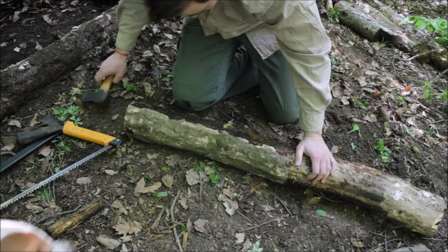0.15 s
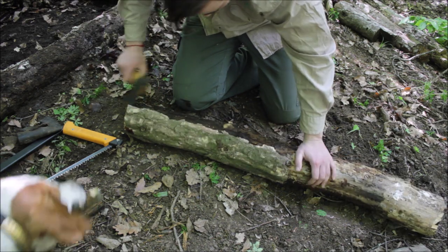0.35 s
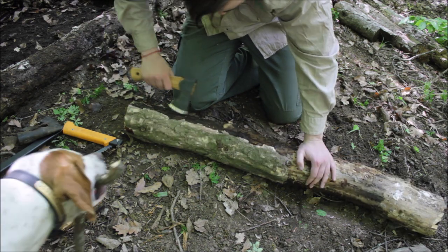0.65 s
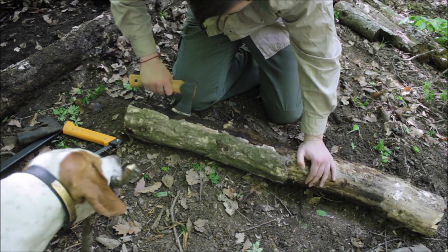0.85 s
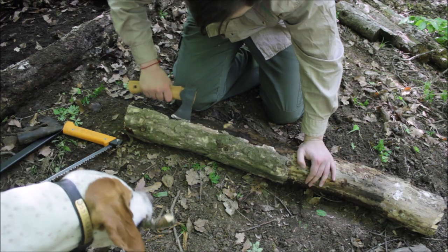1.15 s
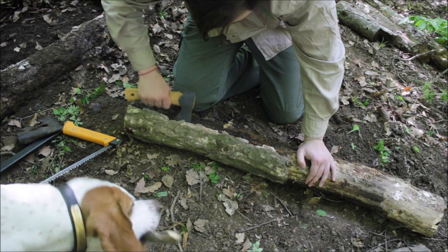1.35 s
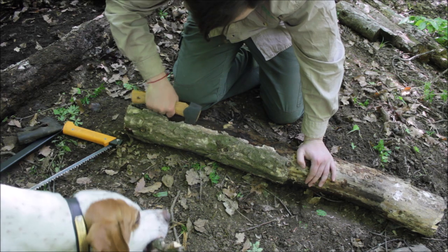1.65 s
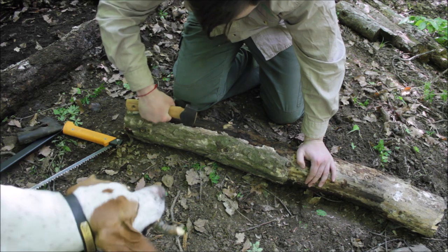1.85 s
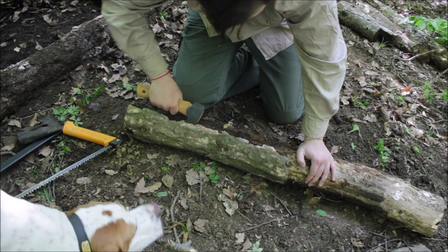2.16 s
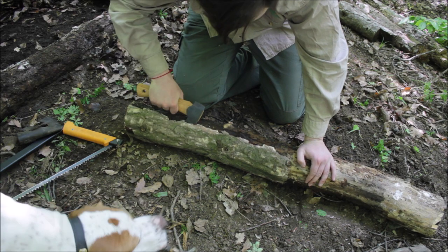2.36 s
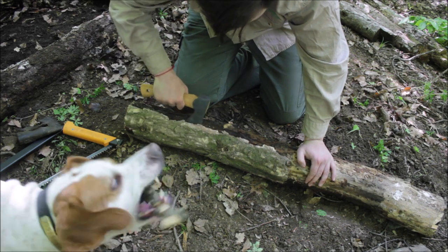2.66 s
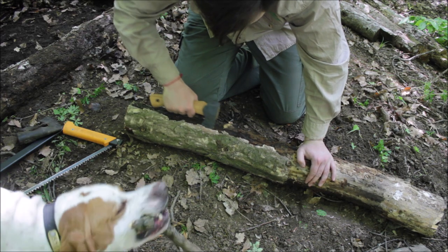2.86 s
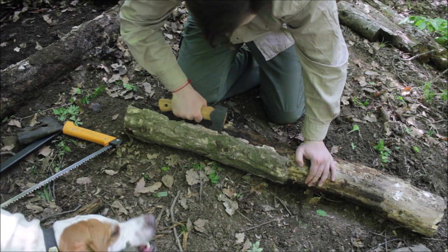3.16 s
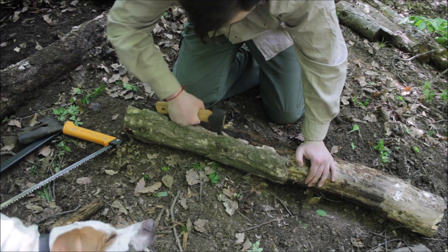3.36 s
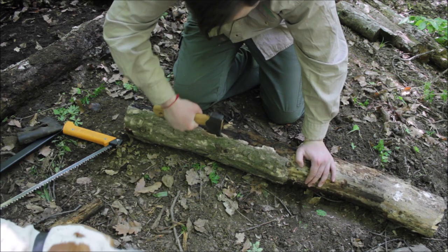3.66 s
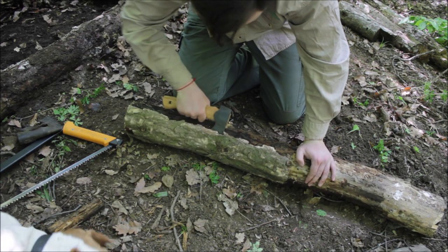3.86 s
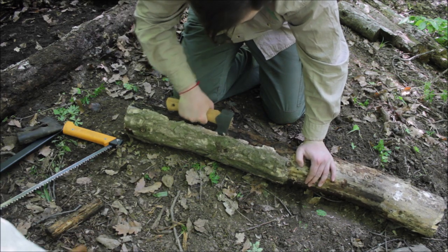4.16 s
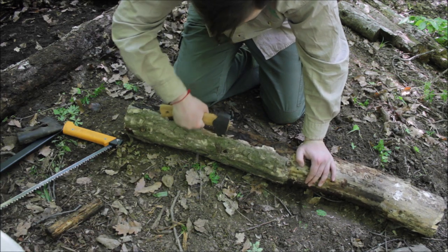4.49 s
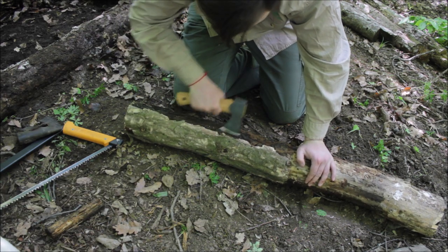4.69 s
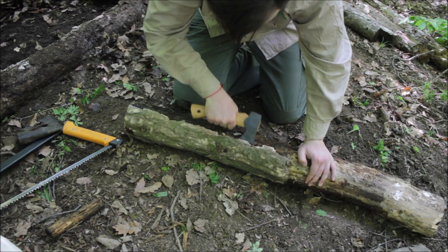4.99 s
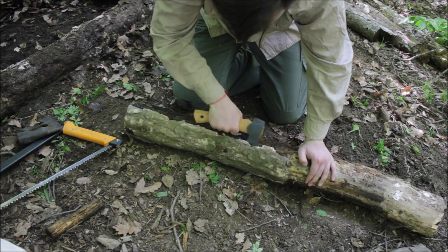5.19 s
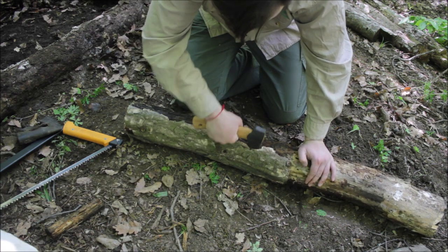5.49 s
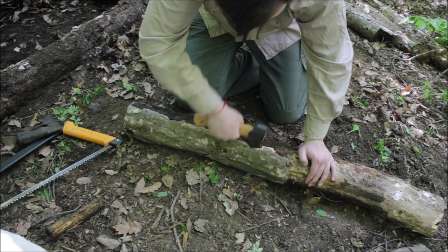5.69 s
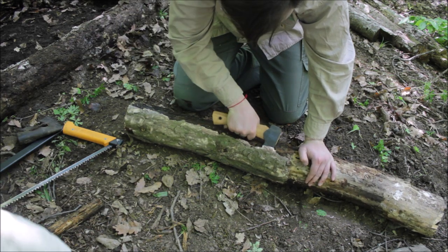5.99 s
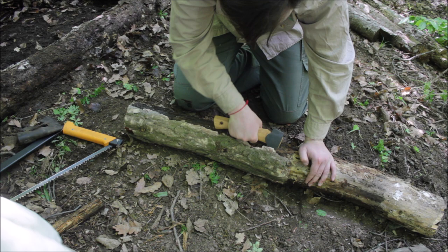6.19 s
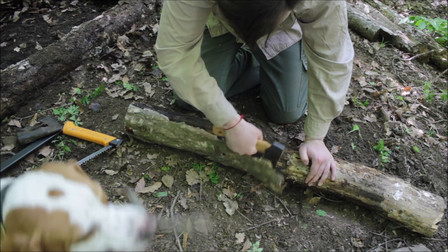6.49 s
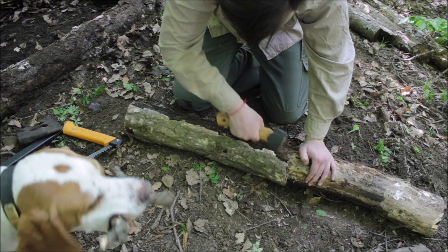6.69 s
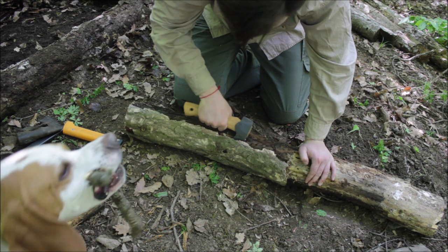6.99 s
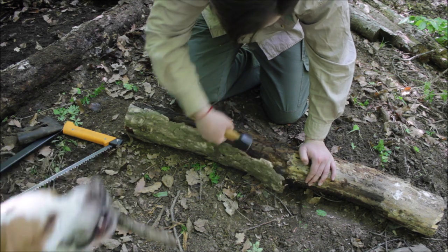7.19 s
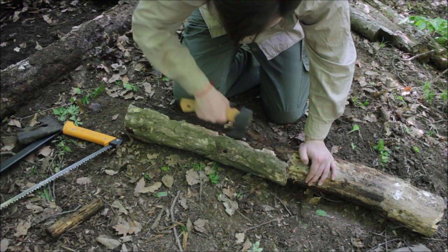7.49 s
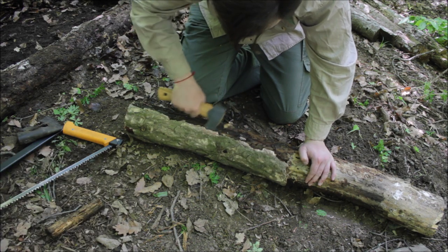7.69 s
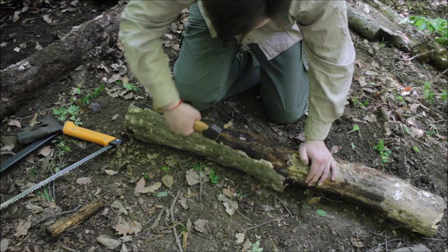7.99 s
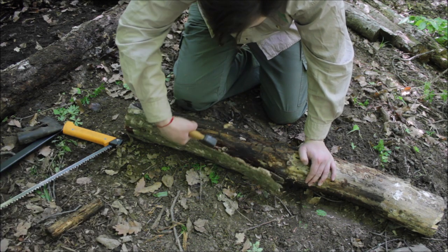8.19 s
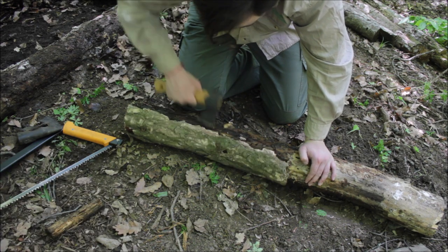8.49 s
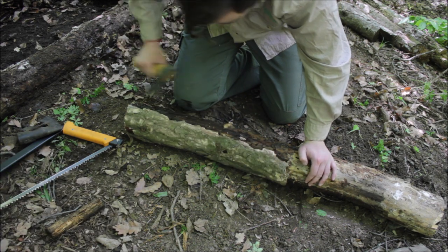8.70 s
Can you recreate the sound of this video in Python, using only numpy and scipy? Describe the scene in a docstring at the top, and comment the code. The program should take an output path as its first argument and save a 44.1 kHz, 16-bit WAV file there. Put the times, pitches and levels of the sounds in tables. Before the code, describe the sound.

Close to one microphone on a quiet forest floor, a hatchet works bark off a rotten log. A dense burst of crackling comes early, then scattered snaps and scrapes while birds chirp and whistle. A hard knock with a short steel clack lands midway; afterwards prying gets busier, with dull thuds, crumbling fibres and rasping wood until the end.

```python
"""Prying bark off a rotten log

A hatchet pries loose bark off a rotten log on the forest floor, close to one microphone.
Fibres crackle and snap as noise bursts, and flakes of bark ring as short decaying sines.
The soft log answers with dull knocks, sums of damped modes; leaves rustle as dense tiny contacts.
Songbirds whistle gliding sines among echoing trees, over a wash of coloured noise."""
import sys
import numpy as np
from scipy import signal
from scipy.io import wavfile
from scipy.ndimage import uniform_filter1d

SR = 44100
rng = np.random.default_rng(int(sys.argv[2]) if len(sys.argv) > 2 else 0)


def inscribe(sig):
    """Save sig as 16-bit PCM at rate SR to the path in sys.argv[1].

    A 1-D sig is mono; a 2-D sig holds one channel per row.
    Samples are clipped to [-1, 1] before scaling.
    """
    pcm = np.round(np.clip(np.atleast_2d(sig).T, -1, 1) * 32767)
    wavfile.write(sys.argv[1], SR, pcm.astype(np.int16))


N = 390285  # length in samples


def amp(db):
    """Level definition: decibels become an amplitude gain."""
    return 10 ** (np.asarray(db) / 20)


def unit(x):
    """Energy normalisation: the squares sum to 1."""
    return x / np.sqrt(np.sum(x ** 2) + 1e-20)


def evened(x):
    """Power normalisation: the rms becomes 1."""
    return unit(x) * np.sqrt(len(x))


def add(mix, s, sound):
    """Superposition: a sound is summed into the mix from time s on."""
    part = mix[max(round(s * SR), 0):][:len(sound)]
    part += sound[:len(part)]


def colour(points, size=2048):
    """Minimum phase: a spectrum becomes a causal impulse response of energy 1."""
    f, db = np.transpose(points)
    hz = abs(np.fft.fftfreq(size, 1 / SR))
    log_gain = np.log(amp(np.interp(np.log(hz + 1), np.log(f), db)))
    # the Hilbert transform of the log gain gives the phase
    spectrum = np.exp(np.conj(signal.hilbert(log_gain)))
    return unit(np.fft.ifft(spectrum).real[:size // 2])


def through(x, response):
    """Linear filtering: convolution with a response, cut to the input length."""
    return signal.oaconvolve(x, response)[:len(x)]


def fade(t, t60):
    """Exponential decay: the level falls by 60 dB in t60 seconds."""
    return np.exp(-np.log(1000) * t / t60)


def decaying_sine(t, hz, t60):
    """Damped resonance: a single mode rings and loses its energy exponentially."""
    return np.sin(2 * np.pi * hz * t) * fade(t, t60)


def wander(count, size):
    """Slow random modulation: noise of rms 1, smoothed over size samples."""
    noise = rng.standard_normal(count + size)
    smooth = uniform_filter1d(uniform_filter1d(noise, size), size // 2)
    return evened(smooth[:count])


def fracture(t, spectrum, break_t60, scatter_db, scatter_t60):
    """Impulsive fracture: fibres split in a burst that peaks in under 1 ms; the litter scatters it."""
    burst = unit(rng.standard_normal(len(t)) * fade(t, break_t60) * t)
    scatter = unit(rng.standard_normal(len(t)) * fade(t, scatter_t60))
    return unit(through(burst + amp(scatter_db) * scatter, colour(spectrum)))


def grains(per_s, spread_db, hiss, clump_db):
    """Granular excitation: uneven tiny breaks in clumps over sliding hiss, held to an even local rms."""
    size = amp(spread_db * np.minimum(rng.exponential(1, N), 3))
    clicks = evened(size * rng.choice([-1, 1], N) * (rng.random(N) < per_s / SR))
    contact = clicks + hiss * rng.standard_normal(N)
    drive = contact * amp(clump_db * wander(N, size=300))
    return drive / np.sqrt(uniform_filter1d(drive ** 2, size=2600))


# relative spectrum of the air in the trees: f/Hz, density/dB
FOREST_SPECTRUM = [(20, -30), (40, -8), (65, 4), (110, -3.5), (200, -3), (350, 0), (700, -7.5), (1300, -9),
                   (2500, -10), (6000, -13.5), (16000, -14.5)]
FOREST_DB = -56


def forest(swell_db=1.18):
    """Broadband ambience: air in the trees is a quiet, slowly swelling wash of filtered noise."""
    wash = through(rng.standard_normal(N), colour(FOREST_SPECTRUM, size=8192))
    return amp(FOREST_DB + swell_db * wander(N, size=12000)) * wash


# syllables as pitch and level curves: t/s from the syllable's start, f/Hz, relative level/dB
CHIP_CURVE = [(0, 6450, 15), (.009, 4850, 2.5), (.023, 4250, -0.5), (.042, 4650, -1.5), (.053, 4180, -5),
              (.063, 3400, 1), (.074, 3035, -14), (.1, 3870, -11)]  # plunges, then descends unevenly and lifts at the end
SLUR_CURVE = [(0, 6600, 19), (.012, 5150, 3.5), (.03, 4550, 8), (.048, 4150, 2), (.072, 3900, 3),
              (.09, 3250, -13), (.105, 3700, -3.5), (.14, 4200, 2)]  # falls, dips and lifts again
GLIDE_CURVE = [(0, 5060, -6), (.012, 5190, -1), (.04, 4890, -2), (.08, 4650, -6), (.1, 4200, 2),
               (.118, 3100, 0)]  # sinks slowly, then plunges
# when each syllable is sung: t/s, level/dB added to the curve's level
CHIP_TIMES = [(.708, -40), (1.402, -39.5), (2.12, -39.5)]
SLUR_TIMES = [(0.334, -50.5), (1.036, -44), (1.755, -43)]
GLIDE_TIMES = [(1.66, -45.5), (1.868, -45)]
# free whistles: t/s, length/s, level/dB, list of f/Hz at even steps from start to end
WHISTLES_SUNG = [(0.875, 0.2, -44, [2455, 2950, 2690, 2540, 2733, 2914, 2870]),
                 (1.207, 0.058, -50, [2000, 2200, 2590, 2200]),
                 (2.198, 0.054, -41, [3120, 2904, 2940, 2500]),
                 (2.259, 0.076, -38, [2217, 2670, 2920, 2930]),
                 (2.359, 0.068, -36, [3930, 3070, 2634, 2150]),
                 (2.603, 0.2, -35.5, [2415, 3437, 3493, 2996]),
                 (2.844, 0.11, -38.5, [2350, 2542, 2548, 2554]),
                 (3.112, .036, -39.5, [3630, 3880, 3280, 3160]),
                 (3.16, 0.066, -33, [3760, 3667, 3350, 2380]),
                 (3.221, 0.053, -41.5, [2600, 2060, 2450, 2200]),
                 (3.353, 0.12, -35.5, [3630, 3257, 2938, 3020]),
                 (3.49, 0.059, -35, [2840, 3036, 3350, 3530]),
                 (3.629, 0.12, -37, [4240, 3900, 2927, 2483, 2454, 2465, 2520]),
                 (3.847, 0.059, -47, [2020, 2070, 2130]), (3.899, 0.043, -36, [2150, 2745, 2810, 2400]),
                 (8.469, 0.21, -52, [1933, 1718, 1890, 2186, 2140]),
                 (8.732, 0.12, -52, [2480, 2600, 2550, 2200])]
# the chirping bird sits deep in the leaves; the others are heard drier
CHIRP_ECHO_DB, GLIDE_ECHO_DB, WHISTLE_ECHO_DB = 6.5, -8, -2.5


def notes():
    """Frequency modulation: yields each note's start/s, pitch curve/Hz, level/dB and echo share/dB."""
    sung_syllables = [
        (CHIP_CURVE, CHIP_TIMES, CHIRP_ECHO_DB),
        (SLUR_CURVE, SLUR_TIMES, CHIRP_ECHO_DB),
        (GLIDE_CURVE, GLIDE_TIMES, GLIDE_ECHO_DB),
    ]
    for syllable, sung, echo_db in sung_syllables:
        ages, pitches, levels = np.transpose(syllable)
        age = np.arange(0, ages[-1], 1 / SR)
        for s, db in sung:
            yield s, np.interp(age, ages, pitches), db + np.interp(age, ages, levels), echo_db
    for s, length, db, pitches in WHISTLES_SUNG:
        # a polynomial glides smoothly through all the given pitches
        arch = np.polyfit(np.linspace(0, 1, len(pitches)), pitches, len(pitches) - 1)
        yield s, np.polyval(arch, np.linspace(0, 1, int(length * SR))), db, WHISTLE_ECHO_DB


NOTE_FADE_S = 0.01
ECHO_PER_FAINT_DB = 1.1  # dB more echo for each dB that a note is fainter than a close one


def birds(direct_db=-0.1, leaves_db=-6, leaves_t60=0.11, near_db=-1, near_t60=0.27,
          far_db=-1.5, far_t60=0.77, flutter_db=0.8, waver=0.0038, close_db=-45, clump_db=3):
    """Reverberation: leaves blur the whistles; near trunks and the deeper forest throw them back."""
    direct, song, t = np.zeros(N), np.zeros(N), np.arange(SR) / SR
    for s, hz, db, wet_db in notes():
        # a fainter note comes from further off, so more of it is echo and it wavers more
        faintness_db = max(close_db - np.mean(db), 0)
        echo = amp(ECHO_PER_FAINT_DB * faintness_db + wet_db)
        hz = hz * (1 + waver * echo * wander(len(hz), size=120))
        edges = signal.windows.tukey(len(hz), 2 * NOTE_FADE_S * SR / len(hz))
        loudness = amp(db + flutter_db * wander(len(hz), size=300)) * edges
        # direct and echo shares keep a constant summed power
        note = loudness * np.sin(2 * np.pi * np.cumsum(hz) / SR) / np.hypot(1, echo)
        add(direct, s, note)
        add(song, s, note * echo)

    def echoes(t60):
        """Clustered reflections: trees stand in groups, so their echoes arrive in clumps."""
        return unit(rng.laplace(size=SR) * amp(clump_db * wander(SR, size=700)) * fade(t, t60))

    leaves, near, far = echoes(leaves_t60), echoes(near_t60), echoes(far_t60)
    # the high notes scatter most
    highpass = signal.butter(2, 4000, "high", fs=SR, output="sos")
    scattered = signal.sosfilt(highpass, song)
    near_echo = amp(near_db) * through(scattered, near)
    blur = through(song, amp(leaves_db) * leaves + amp(far_db) * far)
    return amp(direct_db) * direct + near_echo + blur


# relative spectra of fine crackle and of woody scrape: f/Hz, density/dB
CRACKLE_SPECTRUM = [(200, -15.5), (900, -16.5), (2000, -3.5), (4000, 1.5), (7000, 0), (11000, 1.5),
                    (16000, -2)]
SCRAPE_SPECTRUM = [(30, -48), (160, 1), (330, 3.5), (600, -3.5), (900, 0.5), (1350, 8), (2100, 3.5),
                   (3500, -14), (8000, -10)]
# something brushes lightly over dry leaves or cloth: t/s, length/s, drive level/dB
BRUSH_STROKES = [(0, 0.16, -49), (0.16, 0.14, -54), (2.402, 0.15, -46.5), (2.552, 0.2, -50.5),
                 (2.726, 0.22, -54.5), (8.565, 0.064, -50), (8.786, 0.12, -57)]


def brushes(woody_db=-9, arch=0.22):
    """Dense contact noise: a light touch makes so many tiny contacts that they merge into a hiss."""
    t, power = np.arange(N) / SR, np.zeros(N)
    for s, length, db in BRUSH_STROKES:
        near = (t > s) & (t < s + length)
        power[near] += amp(db) ** 2 * abs(np.sin(np.pi * (t[near] - s) / length)) ** arch
    contacts = grains(per_s=4000, spread_db=1.5, hiss=0.46, clump_db=2.5)
    response = colour(CRACKLE_SPECTRUM) + amp(woody_db) * colour(SCRAPE_SPECTRUM)
    return np.sqrt(power) * through(contacts, response)


# the log settling into the soil: t/s, f/Hz, energy level/dB
SOIL_THUMPS = [(0.76, 168, -27), (6.382, 122, -17), (6.556, 160, -20), (6.929, 189, -20.5),
               (7.241, 143, -19), (7.442, 85, -23), (7.637, 190, -20)]


def thumps(t60=0.061):
    """Heavily damped ground motion: soft soil gives under the log with a short, low swell."""
    out, t = np.zeros(N), np.arange(SR // 4) / SR
    for s, hz, db in SOIL_THUMPS:
        add(out, s, amp(db) * unit(decaying_sine(t, hz, t60) * np.sqrt(t)))
    return out


# short rasps of wood rubbing: t/s, length/s, resonance f/Hz, level/dB before radiation
WOOD_RASPS = [(2.725, 0.011, 870, -37.5), (2.753, 0.051, 885, -43.5), (6.757, 0.028, 1126, -38.5),
              (7.643, 0.31, 1230, -54.5), (8.253, 0.0156, 864, -42), (8.297, 0.015, 2000, -43),
              (8.352, 0.14, 1280, -52)]
RASP_DRIFT = .5  # log-frequency shift either way, per root second of rubbing


def rasps(dull=0.25, count=11):
    """Stick-slip: uneven slips drive a woody resonance that shifts from slip to slip, more in long rasps."""
    out, t = np.zeros(N), np.arange(1024) / SR
    for s, length, hz, db in WOOD_RASPS:
        size = int(length * SR)
        slips = rng.standard_normal(size) ** 3 * signal.windows.tukey(size, .5)
        spot = rng.integers(0, count, size)
        pitches = hz * np.exp(RASP_DRIFT * np.sqrt(length) * np.linspace(-1, 1, count))
        rasp = 0
        for k, f in enumerate(pitches):
            response = unit(decaying_sine(t, f, t60=.02)) + dull * colour(SCRAPE_SPECTRUM)
            rasp = rasp + signal.fftconvolve(slips * (spot == k), response)
        add(out, s, amp(db) * np.sqrt(size) * unit(rasp))
    return out


# a patch of bark gives way all at once: t/s, hold/s, fine crackle level/dB,
# woody scrape level/dB (both before the gains in tearing)
BARK_TEARS = [(0.295, 0.0067, -42, -51), (0.38, 0.02, -31.5, -32.5), (0.407, 0.046, -30, -39.5),
              (0.973, 0.051, -55.5, -57), (1.126, 0.011, -44.5, -53), (1.335, 0.011, -29.5, -58),
              (1.699, 0.017, -33.5, -49), (1.82, 0.023, -41.5, -67), (1.938, 0.014, -48, -66),
              (2.029, 0.0086, -45, -72), (2.127, 0.019, -44.5, -54), (2.785, 0.0067, -40, -46.5),
              (3.32, 0.012, -42.5, -49), (3.422, 0.022, -46, -54), (3.625, 0.01, -39, -62),
              (4.085, 0.021, -42, -63), (4.325, 0.046, -42.5, -44), (4.41, 0.0083, -50, -46),
              (5.875, 0.0068, -39, -43), (6.368, 0.0072, -30.5, -39), (6.556, 0.022, -44.5, -51),
              (6.767, 0.042, -30.5, -50), (7.278, 0.041, -47.5, -65), (7.429, 0.016, -38, -45),
              (7.622, 0.029, -46, -43.5), (7.864, 0.009, -37.5, -45), (8.082, 0.025, -29, -49),
              (8.127, 0.024, -32, -45.5)]
TEAR_ATTACK_S, TEAR_FALL_DB_PER_S = 0.0056, 438
# the blade or the loosened bark slides along the log: t/s, length/s, fine crackle level/dB,
# woody scrape level/dB (both before the gains in tearing)
BLADE_DRAGS = [(1.264, 0.1, -38.5, -48), (1.381, 0.16, -39, -50), (1.486, 0.2, -48.5, -62),
               (1.74, .09, -48, -72), (3.463, 0.14, -51.5, -53.5), (3.759, 0.05, -49, -51),
               (3.92, 0.12, -57, -47.5), (4.114, 0.23, -49.5, -51), (5.03, 0.068, -73, -51.5),
               (5.143, 0.19, -52, -55), (5.324, 0.266, -40.5, -49), (5.627, 0.14, -54, -47.5),
               (5.778, 0.095, -47, -44.5), (6.103, 0.14, -54, -54.5), (6.282, 0.26, -46.5, -56),
               (6.686, 0.28, -44, -53.5), (6.886, 0.19, -48.5, -63), (7.09, 0.21, -49.5, -53),
               (7.296, 0.34, -56.5, -55.5), (7.63, 0.3, -48, -55), (7.94, 0.091, -46.5, -52),
               (8.145, 0.19, -53, -68), (8.3, 0.19, -49, -50)]
DRAG_ARCH = 0.61  # small: even pressure all along the stroke; large: a swell in its middle
# leaves stirring under the log and the knees between strokes
LITTER_CRACKLE_DB, LITTER_SCRAPE_DB = -63.5, -61


def pressure():
    """Incoherent addition: powers of crackle and scrape sum; tears start fast and die, drags swell and ease."""
    t = np.arange(N) / SR
    power = np.outer(amp([LITTER_CRACKLE_DB, LITTER_SCRAPE_DB]) ** 2, np.ones(N))
    for s, hold, *db in BARK_TEARS:
        near = (t > s) & (t < s + hold + .5)
        age = t[near] - s
        attack = np.minimum(age / TEAR_ATTACK_S, 1)
        falling_s = np.maximum(age - TEAR_ATTACK_S - hold, 0)
        shape = attack * amp(-TEAR_FALL_DB_PER_S * falling_s)
        power[:, near] += np.outer(amp(db), shape) ** 2
    for s, length, *db in BLADE_DRAGS:
        near = (t > s) & (t < s + length)
        shape = abs(np.sin(np.pi * (t[near] - s) / length)) ** DRAG_ARCH
        power[:, near] += np.outer(amp(db), shape) ** 2
    return np.sqrt(power)


def crumbs(drive, low_hz=420, high_hz=1700, ring_t60=0.052, ring_db=-2, count=14):
    """Resonant excitation: each scrape grain shakes the log and rings a loose crumb at its own pitch."""
    t, out = np.arange(2048) / SR, np.zeros(N)
    kind = np.repeat(rng.integers(0, count, N // 128 + 1), 128)[:N]
    for k, hz in enumerate(np.geomspace(low_hz, high_hz, count)):
        out += through(drive * (kind == k), unit(decaying_sine(t, hz, ring_t60)))
    return evened(through(drive, colour(SCRAPE_SPECTRUM)) + amp(ring_db) * out)


def tearing(crackle_gain_db=0.0, scrape_gain_db=-2.0, crush_db=-41, fibre_db=-7, fibre_t60=0.032):
    """Common excitation: parting fibres and crushed leaves also excite the wood under the blade."""
    t = np.arange(N) / SR
    force, rub = pressure()
    # light pressure breaks fibres one by one, hard pressure crushes many at once
    crush = force / (force + amp(crush_db))
    single = grains(per_s=260, spread_db=6.5, hiss=.25, clump_db=2)
    crushed = grains(per_s=2200, spread_db=0, hiss=0.48, clump_db=-2.5)
    fine = np.sqrt(1 - crush) * single + np.sqrt(crush) * crushed
    coarse = grains(per_s=150, spread_db=5.5, hiss=.25, clump_db=2)
    # the short ring changes pitch at random among 16 kinds of fibre
    kind = np.repeat(rng.integers(0, 16, N // 64 + 1), 64)[:N]
    brief, crackle = t[:1024], np.zeros(N)
    for k, hz in enumerate(np.geomspace(2500, 13000, 16)):
        ring = unit(decaying_sine(brief, hz, fibre_t60))
        split = fracture(brief, CRACKLE_SPECTRUM, break_t60=.0007, scatter_db=-5, scatter_t60=.018)
        crackle += through(fine * (kind == k), unit(split + amp(fibre_db) * ring))
    scrape = crumbs(evened(np.sqrt(1 - crush) * coarse + 0.97 * fine))
    return crackle * force * amp(crackle_gain_db) + scrape * rub * amp(scrape_gain_db)


# blows on the log and the ground: t/s, energy level/dB of the deep thud, of the log's body,
# of its shell (before the gains in knocks and radiation)
LOG_BLOWS = [(0.078, -24, -26, -29), (0.386, -19, -10.5, -11.5), (0.694, -27, -23, -25.5),
             (0.76, -19, -23, -22), (1.004, -31, -27, -22.5), (1.171, -39, -12, -12),
             (2.117, -33, -44, -12.5), (4.3246, 2.5, 11, 5), (4.579, -28, -19, -17.5),
             (4.695, -44, -18.5, -23), (4.928, -30, -26, -20.5), (5.2, -30, -30, -22),
             (5.383, -19, -19, -40), (5.468, -15.5, -23, -15.5), (5.523, -22, -20, -31),
             (5.684, -22, -16.5, -14.5), (5.792, -25, -21, -18), (6.374, -9.5, -4.5, -38),
             (6.481, -34, -21, -30), (6.5542, -7.5, -3.5, -19), (6.771, -38, -17, -17),
             (6.929, -14, -27, -28), (7.2376, -24, -6.5, -16), (7.2445, -27, 0.5, -24),
             (7.44, -24, -32, -29), (7.637, -22, -31, -20), (7.835, -23, -18, -20), (8.073, -14, -15, -14),
             (8.463, -22, -19, -15.5)]
# modes of the log: f/Hz, relative level/dB, t60/s
# the first two are the thud, the next three the body, the rest the shell
LOG_MODES = [(235, -8, 0.047), (247, 16, 0.023), (358, 8.5, 0.02), (446.5, -7.5, 0.12), (530, -21, 0.0087),
             (670, 2, 0.039), (813, 9.5, 0.048), (923, 13, 0.019), (1163, 18, 0.016)]
# relative spectrum of crumbling rotten fibres: f/Hz, density/dB
CRUMBLE_SPECTRUM = [(150, -18.5), (300, -5), (1100, 0.5), (4000, -23)]


def knocks(body_gain_db=-1, shell_gain_db=-1, crumble_db=-14, crumble_t60=0.055):
    """Modal synthesis: the struck spot decides which brief modes of damp wood speak; fibres crumble."""
    out, t = np.zeros(N), np.arange(SR // 4) / SR
    modes = np.array([amp(db) * decaying_sine(t, hz, t60) for hz, db, t60 in LOG_MODES])
    thud, body, shell = (unit(group.sum(0)) for group in np.split(modes, [2, 5]))
    for s, thud_db, body_db, shell_db in LOG_BLOWS:
        ring = amp(thud_db) * thud
        ring = ring - amp(body_db + body_gain_db) * body  # opposite in phase
        ring = ring + amp(shell_db + shell_gain_db) * shell
        noise = rng.laplace(size=len(t)) * fade(t, crumble_t60)
        crumble = unit(through(noise, colour(CRUMBLE_SPECTRUM)))
        add(out, s, ring + amp(crumble_db) * np.linalg.norm(ring) * crumble)
    return out


# the hatchet's head strikes the log: t/s, energy level/dB before radiation
HEAD_STRIKES = [(4.322, -9), (4.3247, 0.5), (6.554, -23.5), (7.237, -14)]
# modes of the damped steel: f/Hz, relative level/dB, t60/s
BLADE_MODES = [(2770, -2, 0.013), (3700, 5, 0.017), (4200, 5, 0.01), (4500, 3, 0.03)]


def strike():
    """Contact damping: the steel clacks in a few modes, damped at once by the wood."""
    out, t = np.zeros(N), np.arange(2048) / SR
    clack = unit(sum(amp(db) * decaying_sine(t, hz, t60) for hz, db, t60 in BLADE_MODES))
    for s, db in HEAD_STRIKES:
        add(out, s, amp(db) * clack)
    return out


# the clearest breaks of bark and fibre: t/s, energy level/dB of the sharp tick, of the crack,
# of the ringing flake (all before radiation), flake f/Hz
BARK_SNAPS = [(0.168, -13, -40, -36, 2400), (0.367, -32, -28, -14, 1940), (0.3826, -8, -13, -9, 1620),
              (0.4071, -20, -15, -10, 1730), (0.4126, -1, -22, -7.5, 2200), (0.4133, 6, -24, -25, 1400),
              (0.4217, -11, -22, -11, 2000), (0.427, -1, -25, -18, 1490), (0.4295, 7, -0.5, -10.5, 1120),
              (0.4325, 0, -9, -15, 1710), (0.4377, -6, -18, -10, 1600), (0.4409, 3.5, -21, -18, 1230),
              (0.4533, -1, -22, -20, 1160), (0.9344, -14, -18, -25, 2210), (1.1262, -10, -13.5, -17, 1610),
              (1.2981, -28, -14, -17, 2000), (1.3105, -17, -28, -19, 1650), (1.4648, -11, -15, -22, 1590),
              (1.4698, -3, -11, -32, 1690), (1.4868, -2.5, -29, -20.5, 1460),
              (1.7117, 2.5, -5, -17.5, 1920), (1.721, -2, -19, -27, 2330), (1.7286, 3.5, -12, -17, 1480),
              (1.7482, 1.5, -14, -17.5, 1490), (1.784, -4.5, -24, -25, 1510),
              (1.818, -3.5, -16, -11.5, 1330), (1.932, 4, -6.5, -16, 1270), (1.9625, -9.5, -35, -36, 1400),
              (2.47, -17, -15.5, -31, 1250), (3.2775, -7.5, -15, -10, 1320),
              (3.3093, -11, -22, -14.5, 1380), (3.3273, 2.5, -4, -17.5, 1450), (3.361, -8, -24, -25, 1210),
              (3.4272, -7.5, -22, -26, 1830), (3.39, -32, -28, -17.5, 1190),
              (3.482, -11.5, -23, -15.5, 1400), (3.5052, -9.5, -28, -21, 1200),
              (3.525, -14, -26, -31, 1400), (3.5307, 0, -11.5, -19.5, 1200), (3.582, -12, -36, -29, 1800),
              (3.5915, -5, -37, -36, 2110), (3.6292, 1.5, -13, -24, 2330), (3.815, -33, -36, -16.5, 1990),
              (4.092, -11, -37, -42, 2420), (4.112, -11, -16.5, -15, 1250), (4.2043, -19, -16.5, -21, 1340),
              (4.3252, -30, -16, 0, 950), (4.357, -22, -29, -7.5, 1470), (4.372, -13, -24, -15, 1400),
              (4.416, -17, -20, -25, 1300), (4.4294, -20, -28, -17.5, 1190),
              (4.5793, -24, -20.5, -15, 1170), (4.817, -38, -29.5, -25, 1500),
              (5.316, -14.5, -22, -45, 1420), (5.381, -6.5, -8.5, -10.5, 1450),
              (5.4005, -16, -16, -20, 1490), (5.408, 1, -9.5, -24, 1740), (5.4274, 0.5, -21, -21, 1440),
              (5.4402, 2, 4, -2.5, 1460), (5.466, 0, -3, -17, 1400), (5.4702, 1.5, -7, -15, 1420),
              (5.487, -2.5, -13, -16, 1520), (5.5006, -6, -19, -27, 1570), (5.5063, -4, -16, -22, 1680),
              (5.5154, -8, -25, -29, 1700), (5.524, -5, -13, -4.5, 1590), (5.561, -8.5, -16, -27, 1500),
              (5.5643, -8, -15.5, -21, 1360), (5.632, -17, -24, -29, 1500),
              (5.6836, -5.5, -14.5, -20, 1520), (5.8886, -13.5, -14.5, -14, 1430),
              (6.1406, -14, -37, -27, 1620), (6.166, -29, -41, -16, 1325), (6.205, -10.5, -28, -39, 1440),
              (6.3184, -7, -23, -21, 1440), (6.35, -8, -13, -13.5, 1550), (6.3748, 3, -3, -3, 1270),
              (6.3785, 2, -0.5, -5.5, 1500), (6.382, 5, 0, -14, 1280), (6.397, -19, -26, -15, 1000),
              (6.4805, -3, -4.5, -17.5, 1290), (6.481, -4, -7, -12, 1260), (6.7904, -25, -3.5, -18, 2250),
              (6.9254, -9, -16.5, -15.5, 1150), (6.9688, -10.5, -16.5, -40, 2150),
              (7.237, -26, -14, -13, 1110), (7.2702, -3, -15, -26, 1750), (7.306, -11.5, -22, -26, 1250),
              (7.8234, -11.5, -34, -37, 1310), (7.8524, -15, -34, -10, 1510), (7.875, -1.5, -17, -15, 1210),
              (7.9148, -10, -32, -35, 1400), (7.9226, -10, -14, -14, 1360), (8.065, -21, -13.5, -22, 1950),
              (8.0715, -32, -7, 1.5, 1480), (8.1023, -2, -15, -14, 1780), (8.1145, 2.5, -20, -19, 1120),
              (8.14, -5, -10, -12, 1830), (8.224, -11, -18.5, -29, 1500), (8.2461, -1, -22, -23, 1980),
              (8.2653, -12, -22, -20, 2000), (8.3059, -13.5, -16.5, -25, 2000),
              (8.3527, -12, -37, -27, 1370), (8.3883, -6.5, -18, -21, 1480), (8.416, -14, -17, -17.5, 1180)]
# relative spectra of tick, crack and the flake's splinters: f/Hz, density/dB
TICK_SPECTRUM = [(2500, -27), (5000, -7.5), (7000, -4.5), (11000, 0.5), (16000, -1)]
CRACK_SPECTRUM = [(900, -17.5), (2200, -6), (3800, 1), (5500, 2.5), (8000, -7), (14000, -35)]
SPLINTER_SPECTRUM = [(60, -36), (250, -21), (700, -12), (1400, 6), (2300, -0.5), (4500, -19)]


def snaps(flake_t60=0.023, splinter=0.78):
    """Release of strain: each break ticks, cracks and sets the freed flake of bark ringing."""
    out, t = np.zeros(N), np.arange(2048) / SR
    for s, tick_db, crack_db, flake_db, hz in BARK_SNAPS:
        tick = fracture(t, TICK_SPECTRUM, break_t60=0.0015, scatter_db=-8.5, scatter_t60=0.031)
        crack = fracture(t, CRACK_SPECTRUM, break_t60=0.0013, scatter_db=-6, scatter_t60=0.028)
        ring = unit(decaying_sine(t, hz, flake_t60))
        splinters = fracture(t, SPLINTER_SPECTRUM, break_t60=0.0032, scatter_db=3.0, scatter_t60=0.06)
        flake = unit(ring + splinter * splinters)
        add(out, s, amp(tick_db) * tick + amp(crack_db) * crack + amp(flake_db) * flake)
    return out


def radiated(x, corner_hz=185):
    """Radiation efficiency: a thin log radiates little bass, as a high-pass filter."""
    return signal.sosfilt(signal.butter(4, corner_hz, "high", fs=SR, output="sos"), x)


def scene():
    """Superposition: the forest, the birds and the work on the log sum in one channel."""
    background = forest() + birds() + brushes()
    wood = radiated(rasps() + knocks() + strike() + snaps())
    return (background + thumps() + tearing() + wood)[None]


EDGE_HZ = 16100


def record(dry):
    """Band limitation: the recorder passes only what lies below its upper edge."""
    lowpass = signal.firwin(301, EDGE_HZ, window=("kaiser", 8), fs=SR)
    return signal.oaconvolve(dry, lowpass[None], "same")


dry = scene()
out = record(dry)
inscribe(out)
```